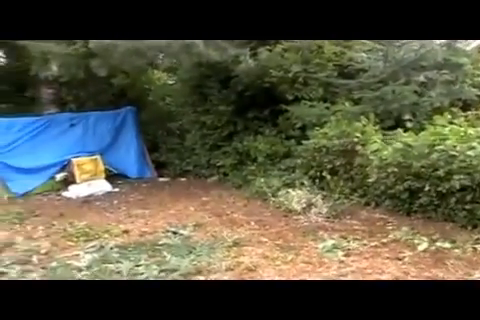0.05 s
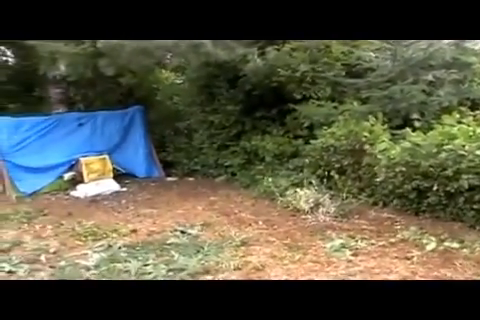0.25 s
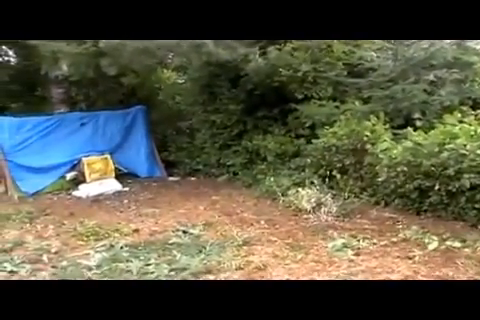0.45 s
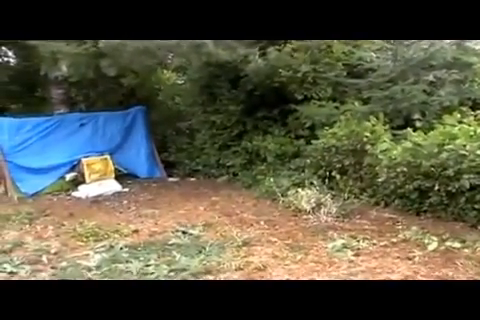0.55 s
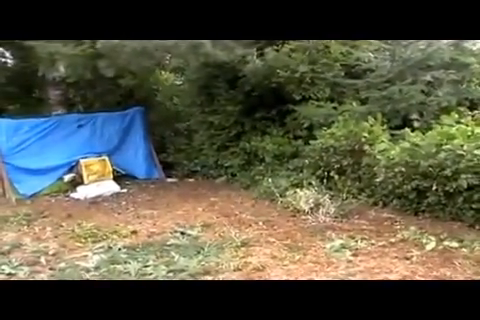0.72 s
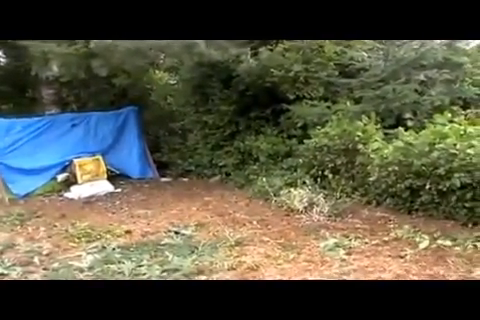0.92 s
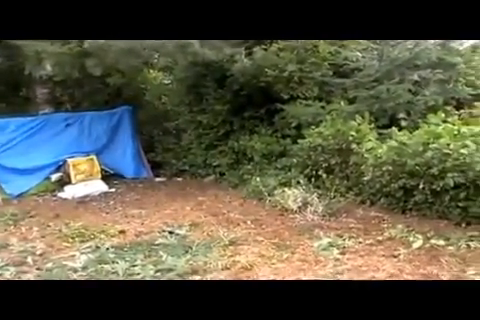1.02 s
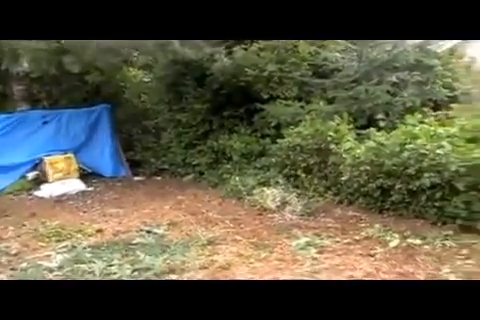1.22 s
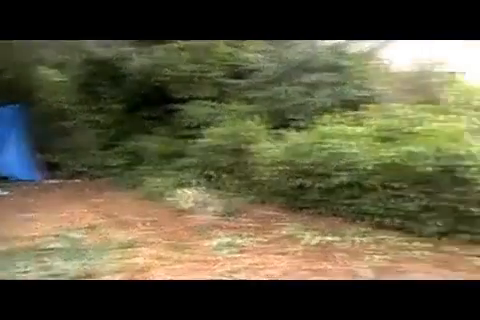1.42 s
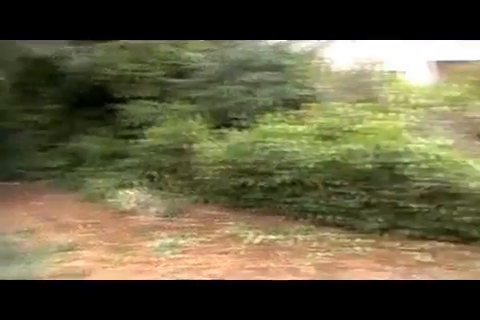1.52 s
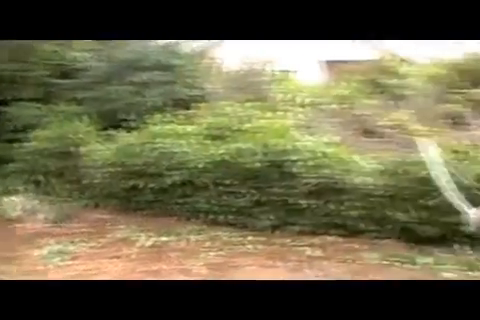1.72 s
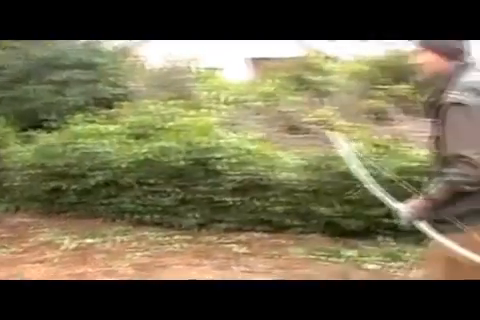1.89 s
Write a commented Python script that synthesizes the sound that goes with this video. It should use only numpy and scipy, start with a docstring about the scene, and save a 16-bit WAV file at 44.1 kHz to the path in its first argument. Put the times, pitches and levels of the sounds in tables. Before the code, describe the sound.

A bow is shot close to the microphone: the string snaps with a brief rattle, and the arrow cracks into a target a moment later. Both echo lightly around a tree-lined yard, followed by faint gear clicks and rustling cloth.

```python
"""A bow is shot close by, in a yard ringed by trees.
The string rushes forward and slaps home; limbs and fittings knock, rattle and ring.
The arrow whistles faintly and cracks into the target. Yard and trees throw the sounds back.
Faint distant ticks and echoes surround the hit; then nearby gear clicks and cloth swishes.
Faint outdoor air and a far hum lie underneath."""
import sys
import numpy as np
from scipy import signal
from scipy.fft import rfft, irfft
from scipy.io import wavfile
from scipy.ndimage import uniform_filter1d

SR = 44100
rng = np.random.default_rng(int(sys.argv[2]) if len(sys.argv) > 2 else 0)


def put_to_file(sound):
    """Save the sound as 16-bit audio at rate SR, in the file named by the first command-line argument."""
    columns = np.atleast_2d(sound).T  # one column per channel
    safe = np.clip(columns, -1, 1)
    whole_steps = np.round(safe * 32767)
    wavfile.write(sys.argv[1], SR, whole_steps.astype(np.int16))


N = 85995
T, HZ = np.arange(N) / SR, np.fft.rfftfreq(N, 1 / SR)
EDGE_HZ = 10420
HANDLING_FROM_S = .9

# spectra of air, handling and surroundings: f/Hz, relative level/dB
AIR_COLOUR = [(18, -46), (30, -27.5), (123, -13.5), (139, -12.5), (206, -10), (297, -10), (361, -7),
              (617, -3.5), (681, -3.5), (1110, -6.5), (1940, -8.5), (2600, -14), (3320, -15.5),
              (4450, -20.5), (10200, -25), (13300, -91), (22000, -120)]
SWISH_COLOUR = [(1000, -25), (3500, -3), (7500, 0)]
RUSTLE_COLOUR = [(40, -2), (140, -4.5), (300, -4.5), (700, 4), (1800, 3), (3500, -12), (10000, -8.5)]
BUMP_COLOUR = [(30, -14), (80, -4), (150, -1.5), (300, -19), (2000, -34), (10000, -50)]
YARD_COLOUR = [(40, -21), (200, 3), (450, -2), (1000, 4.5), (1900, -4.5), (3500, 0), (6000, -1), (8000, -3),
               (10000, -5.5)]
ECHO_COLOUR = [(60, -18), (450, -1), (1000, -6.5), (2050, -3), (3000, -8.5), (9000, -13.5)]
# spectra of target and bow: f/Hz, relative level/dB
HIT_COLOUR = [(40, -36), (120, -21), (250, -7), (1000, 0), (1800, -0.5), (3000, -3.5), (4200, -2),
              (6000, -1.5), (7900, 5), (10000, -7)]
SHAKE_COLOUR = [(40, -25), (150, -15), (330, -4.5), (560, -1), (1100, -4.5), (1900, 3.5), (2300, 2.5),
                (2900, -4), (5000, -3), (7300, -4), (10000, -15)]
RUSH_COLOUR = [(60, -16), (250, -4.5), (550, 6.5), (1100, 5.5), (2000, -2), (3000, 0), (6000, -8.5),
               (9500, -6.5)]
SLAP_COLOUR = [(60, -37.5), (380, -12), (600, -6), (850, 2), (1150, 4), (1620, -9), (2000, 2), (2600, -2.5),
               (5000, -0.5), (10000, -8)]
RATTLE_COLOUR = [(60, -17), (140, -40), (300, -18), (500, -9.5), (750, -4), (1200, -2.5), (1450, -2),
                 (2100, 3), (2600, -3.5), (4500, -5), (7300, -5), (10000, -11)]
# noise decay: f/Hz, t60/s
YARD_T60 = [(100, 0.5), (600, 0.71), (2000, 0.98), (5000, 0.64), (10000, 0.66)]
SHAKE_T60 = [(100, 0.084), (500, 0.16), (2000, 0.16), (9000, 0.14)]
RATTLE_T60 = [(100, 0.24), (600, 0.22), (2000, 0.2), (5000, 0.22), (10000, 0.18)]
# struck resonances: f/Hz, relative level/dB, t60/s
GEAR_MODES = [(3350, -33, .025), (3850, -34, .03), (6970, -27, .025), (7660, -33, .09)]
TARGET_MODES = [(500, -17, 0.018), (920, -17, 0.0064), (1580, -3.5, 0.0063), (1970, -3, 0.0055)]
LIMB_MODES = [(620, -20, 0.02), (900, -15, .012), (1170, -11.5, 0.013)]
BOW_MODES = [(727, -19, 0.2), (905, -22, 0.29), (1118, -8, 0.11), (1220, -10, 0.12), (1572, -20.5, 0.47),
             (1810, -5, 0.05), (1958, 4.5, 0.054), (2175, -7, 0.13), (2868, -14.5, 0.2), (3230, -8, 0.1),
             (3514, -10, 0.13), (4086, -12, 0.12), (5000, -8, 0.11)]
# far hum: f/Hz, level/dB
HUM_BANDS = [(209.9, -70), (656.8, -74)]
# rubbing movements: t/s, half width/s, level/dB
SWISHES = [(1.13, 0.22, -63.5), (1.432, .026, -57.5), (1.62, .05, -64), (1.93, .028, -59)]
RUSTLES = [(1.439, 0.041, -50), (1.59, 0.1, -55.5), (1.86, 0.079, -58.5)]
# reflections: delay/s, level/dB, blur t60/s
TREE_ECHOES = [(.095, -35, 0.045), (.165, -35.5, 0.041), (.2, -37, 0.24), (.275, -44, .08)]
NEAR_ECHOES = [(.0094, -10, .012), (.022, -22, .025)]
# faint distant ticks and echoes around the hit, then nearby gear from HANDLING_FROM_S:
# t/s, level/dB, f/Hz, width/octaves, skirt/dB, t60/s, L-R/dB
TICKS = [(0.404, -18, 2965, 0.2, -9, 0.15, -2), (0.508, -17, 1470, 0.46, -27, 0.024, -2),
         (0.527, -24, 600, 0.66, -25, 0.03, 4), (0.5908, -20, 2920, 0.49, -9, 0.038, -3),
         (0.604, -25, 560, 0.4, -14, 0.024, -1), (0.626, -26.5, 3000, 0.19, -22, 0.068, -1),
         (0.848, -29.5, 6000, 3.5, -20, 0.2, 1), (1.0185, -9, 8000, 0.35, -8, 0.055, 5),
         (1.0196, -14, 3600, .3, 0, 0.01, -4), (1.2795, -16.5, 8800, .5, 0, 0.054, 2.5),
         (1.296, -19, 2100, 0.45, -25, 0.018, 5), (1.4485, -13, 670, 0.6, -30, 0.009, 3.5),
         (1.4655, -27, 680, 0.37, -35, .025, -3), (1.553, -25.5, 1940, 0.27, -27, 0.055, -4),
         (1.571, -30.5, 2760, 0.57, -18, 0.023, -4), (1.6301, -31, 6160, 2.9, -15, 0.018, -1),
         (1.838, -27.5, 4040, 0.61, -10, 0.11, 1)]
# contacts: t/s, level/dB
CASE_BUMPS = [(1.408, -30), (1.664, -36)]
HARD_CLICKS = [(1.0186, -9), (1.2795, -23)]
STRING_SLAPS = [(.1727, 1), (.1741, 1.5), (.1756, 6.5), (.179, -2), (.1822, -1.5), (0.1855, -3.5)]
# point breaking the target's face: t after hit/s, level/dB
CRACKS = [(0, 0), (.00055, 0), (.00115, -2)]
# bow's stereo balance: f/Hz, L-R/dB
BOW_PAN = [(100, 0), (400, 5), (1000, -0.5), (3000, 1.5), (6000, 4), (10000, 3)]


def amp(db):
    """dB to gain."""
    return 10 ** (np.asarray(db) / 20)


def curve(points, hz=HZ):
    """Table interpolated over log frequency."""
    f, value = np.transpose(points)
    return np.interp(np.log(hz + 1), np.log(f + 1), value)


def unit(x):
    """Scale to mean energy 1 per channel."""
    return x / np.sqrt(np.mean(np.sum(x ** 2, -1)) + 1e-20)


def pan(db):
    """Stereo gains from L-R."""
    return amp(np.array([[.5], [-.5]]) * db)


def convolve(x, response):
    """Per-channel convolution, cut to N."""
    return signal.fftconvolve(np.atleast_2d(x), np.atleast_2d(response), axes=1)[:, :N]


def at(start_s, x):
    """Place x in N samples of silence."""
    return np.pad(np.atleast_2d(x), ((0, 0), (max(round(start_s * SR), 0), N)))[:, :N]


def low_cut(x, hz):
    """Small bodies radiate little bass."""
    return signal.sosfilt(signal.butter(3, hz, "high", fs=SR, output="sos"), x)


def tick(spectrum_db):
    """Minimum-phase click of energy 1, rolled off above EDGE_HZ."""
    rolloff_db = 30 * np.clip(HZ / EDGE_HZ - 1, 0, 1) ** .5
    cepstrum = irfft(np.log(amp(spectrum_db - rolloff_db)), N)
    cepstrum[1:N // 2] *= 2
    cepstrum[N // 2:] = 0
    return unit(irfft(np.exp(rfft(cepstrum)), N)[:4096])


def attack(rise_s):
    """Exponential onset."""
    return 1 - np.exp(-T / rise_s)


def burst(t60_s, rise_s=1e-4):
    """Decaying stereo noise; t60_s is a number or a table."""
    noise = rng.standard_normal((2, N))
    if np.ndim(t60_s):
        hz, t, spectra = signal.stft(noise, SR, nperseg=256)
        decay = amp(-60 * t / curve(t60_s, hz)[:, None])
        noise = signal.istft(spectra * decay, SR, nperseg=256)[1][:, :N]
    else:
        noise *= amp(-60 * T / t60_s)
    return unit(noise * attack(rise_s))


def tint(x, colour):
    """Filter by a spectrum table."""
    return convolve(x, tick(curve(colour)))


def ring(modes):
    """Damped sines of alternating sign."""
    return sum((-1) ** k * amp(db - 60 * T / t60_s) * np.sin(2 * np.pi * hz * T)
               for k, (hz, db, t60_s) in enumerate(modes))


def wash(gain):
    """Steady shaped stereo noise, rms 1."""
    return np.sqrt(N) * unit(irfft(rfft(rng.standard_normal((2, N))) * gain, N))


def band(hz, half_width_hz):
    """Narrow noise, heard as a wavering tone."""
    return wash(1 / (1 + ((HZ - hz) / half_width_hz) ** 2))


def flicker(depth_db, rate_hz):
    """Random gain, varying up to about rate_hz."""
    return amp(depth_db * wash(1 / (1 + (HZ / rate_hz) ** 4))[0])


def scatter(echoes):
    """Reflections blurred by rough surfaces."""
    return sum(at(delay_s, amp(db) * burst(blur_s)) for delay_s, db, blur_s in echoes)


def click(start_s, db, hz, octaves, skirt_db, t60_s, pan_db):
    """Impulse and short chatter around one resonance."""
    hump = np.exp(-.5 * (np.log2((HZ + 1) / hz) / octaves) ** 2)
    resonance = tick(20 * np.log10(hump + amp(skirt_db)))
    drive = burst(t60_s) + amp(-10) * burst(t60_s=.28)
    drive[:, 0] += amp(-8.5)
    return at(start_s, amp(db) * pan(pan_db) * unit(convolve(drive, resonance)))


def air():
    """Flickering outdoor hiss and a far hum."""
    hiss = amp(-54.5) * wash(amp(curve(AIR_COLOUR))) * flicker(depth_db=1, rate_hz=61)
    return hiss + sum(amp(db) * band(hz, half_width_hz=10.5) for hz, db in HUM_BANDS)


def rub(swells, colour):
    """Grainy friction as cloth moves or the microphone swings round."""
    level = sum(amp(db) * np.exp(-((T - s) / width_s) ** 2) for s, width_s, db in swells)
    return level * wash(amp(curve(colour))) * flicker(depth_db=3, rate_hz=190)


def yard(sources):
    """Diffuse tail plus echoes off the trees."""
    tail = amp(-23) * tint(burst(YARD_T60, rise_s=.012), YARD_COLOUR)
    trees = tint(scatter(TREE_ECHOES), ECHO_COLOUR)
    return convolve(sources, tail + trees)


def far_ticks():
    """Faint distant ticks and echoes around the hit."""
    return low_cut(sum(click(*row) for row in TICKS if row[0] < HANDLING_FROM_S), hz=284)


def bumps():
    """A hand thuds softly on the microphone's case."""
    return sum(at(s, amp(db) * unit(tint(burst(t60_s=.038), BUMP_COLOUR))) for s, db in CASE_BUMPS)


def gear():
    """Nearby gear is handled after the shot: small parts click, hard contacts ring."""
    clicks = sum(click(*row) for row in TICKS if row[0] >= HANDLING_FROM_S)
    rings = sum(at(s, amp(db) * ring(GEAR_MODES)) for s, db in HARD_CLICKS)
    return low_cut(clicks + rings, hz=284)


def flight(peak_s=.38, half_width_s=.022):
    """The arrow whistles; its vanes hiss."""
    whistle = amp(-48) * band(hz=2070, half_width_hz=35)
    hiss = amp(-53.5) * wash(amp(curve(SWISH_COLOUR)))
    return (whistle + hiss) * np.exp(-((T - peak_s) / half_width_s) ** 2)


def target(hit_s=.43015):
    """The point pierces the target, which knocks and shakes; near surfaces reflect the crack."""
    snap = tick(curve(HIT_COLOUR))
    knock = low_cut(at(.0002, ring(TARGET_MODES)), hz=370)
    crack = sum(at(s, amp(db) * snap) for s, db in CRACKS) + knock
    pierce = amp(3.5) * convolve(burst(t60_s=.016), snap)
    shake = amp(.5) * tint(burst(SHAKE_T60, rise_s=.0028), SHAKE_COLOUR)
    reflections = convolve(crack, scatter(NEAR_ECHOES))
    return at(hit_s, pan(db=5) * (crack + pierce + shake + reflections))


def string(ring_s, rest_hz=408, settle_s=.059, t60_s=.3):
    """The string rushes, slaps home, rebounds and hums with sinking pitch."""
    rush = amp(-1) * tint(burst(t60_s=.055, rise_s=.012), RUSH_COLOUR)
    slap = tick(curve(SLAP_COLOUR))
    slaps = np.zeros((2, N))
    for s, db in STRING_SLAPS:
        chatter = amp(-6.5) * convolve(burst(t60_s=.009), slap)
        slaps += amp(db) * (at(s, slap) + at(s, chatter))
    pitch_hz = rest_hz * (1 + .09 * np.exp(-T / settle_s))
    hum = amp(-38 - 60 * T / t60_s) * np.sin(2 * np.pi * np.cumsum(pitch_hz) / SR)
    return at(.1595, rush) + slaps + at(ring_s, hum)


def limbs(ring_s):
    """Pulled up short by the string, the limbs knock, then ring; the fittings rattle."""
    contacts = unit(burst(RATTLE_T60, rise_s=.0032) * flicker(depth_db=2, rate_hz=500))
    rattle = amp(8.5) * tint(contacts, RATTLE_COLOUR)
    knock = ring(LIMB_MODES) * attack(rise_s=.00075)
    ringing = amp(-19) * ring(BOW_MODES) * attack(rise_s=.0011)
    return at(.1725, rattle) + at(.1742, knock) + at(ring_s, ringing)


def bow(ring_s=.1765, right_lag_s=.00006):
    """String and limbs, slightly to the left."""
    shot = string(ring_s) + limbs(ring_s)
    lag = np.exp(-2j * np.pi * HZ * right_lag_s * np.arange(2)[:, None])
    return irfft(rfft(shot) * pan(curve(BOW_PAN)) * lag, N)


def scene():
    """Shot, hit, far ticks and handling in the yard, over the background."""
    sources = bow() + flight() + target() + far_ticks() + gear() + bumps()
    reverb = yard(sources)
    background = pan(db=3) * (air() + rub(SWISHES, SWISH_COLOUR))
    return sources + reverb + background + rub(RUSTLES, RUSTLE_COLOUR)


def record(dry):
    """Brief level dip just before the hit, peak clipping, band limit."""
    dip_from_s, dip_to_s, dip_db = .4115, .4255, -26
    dip = uniform_filter1d(1. * ((T > dip_from_s) & (T < dip_to_s)), size=130)
    clipped = np.clip(dry * amp(dip_db * dip), -1, 1)
    lowpass = signal.firwin(301, EDGE_HZ, window=("kaiser", 10), fs=SR)
    return signal.oaconvolve(clipped, lowpass[None], "same")


dry = scene()
out = record(dry)
put_to_file(out)
```